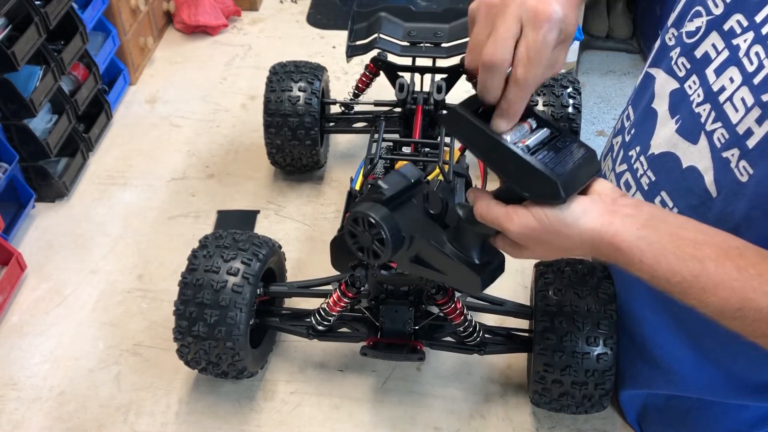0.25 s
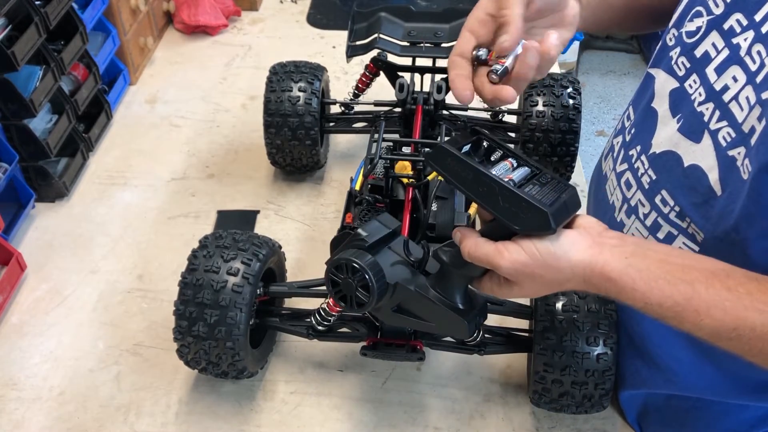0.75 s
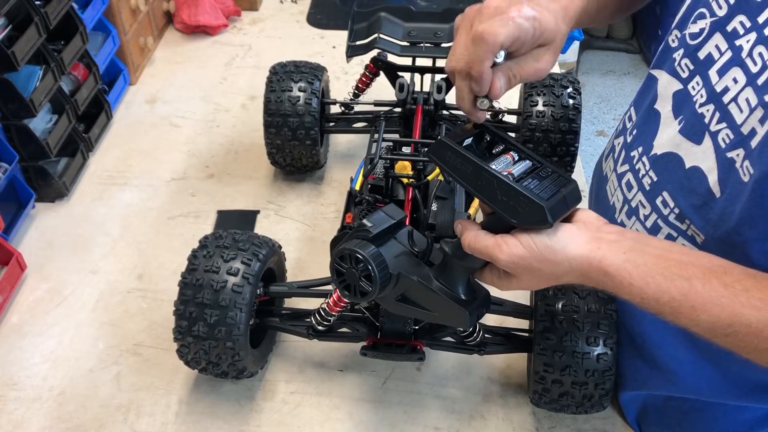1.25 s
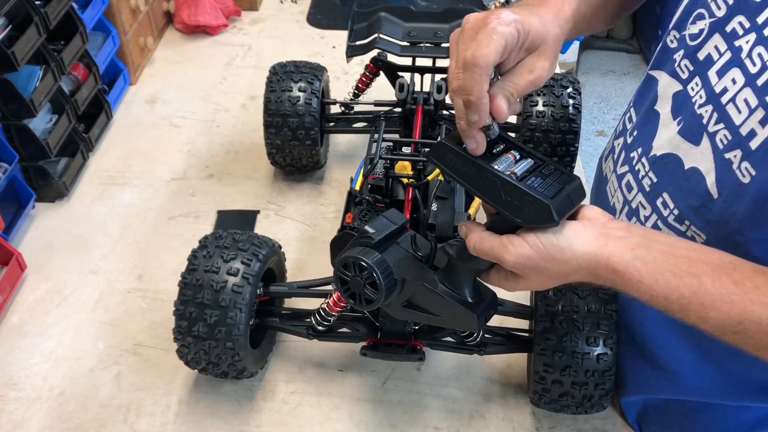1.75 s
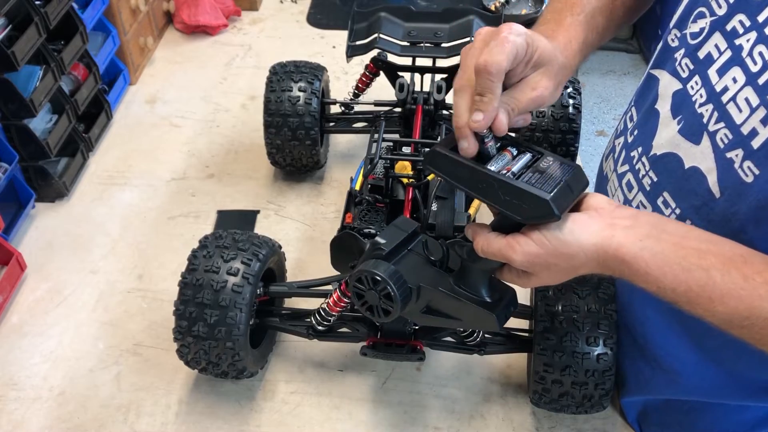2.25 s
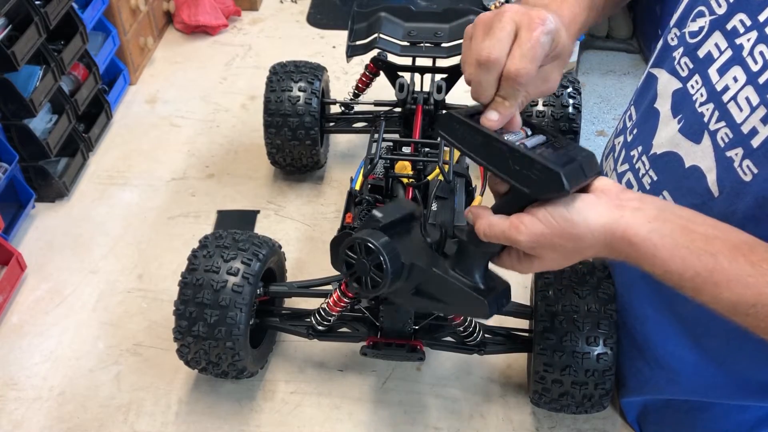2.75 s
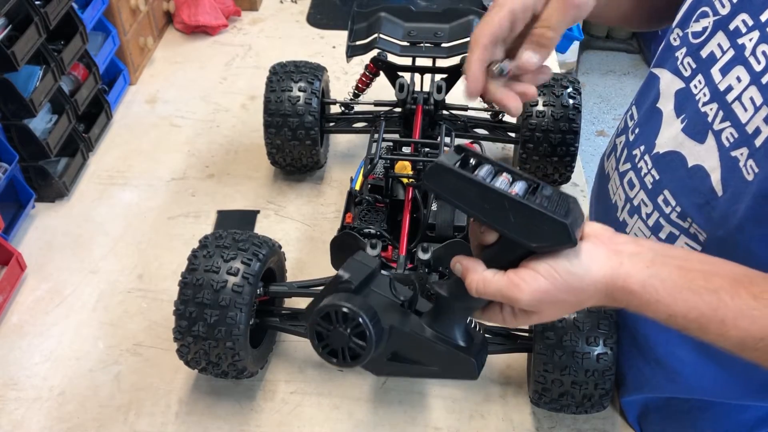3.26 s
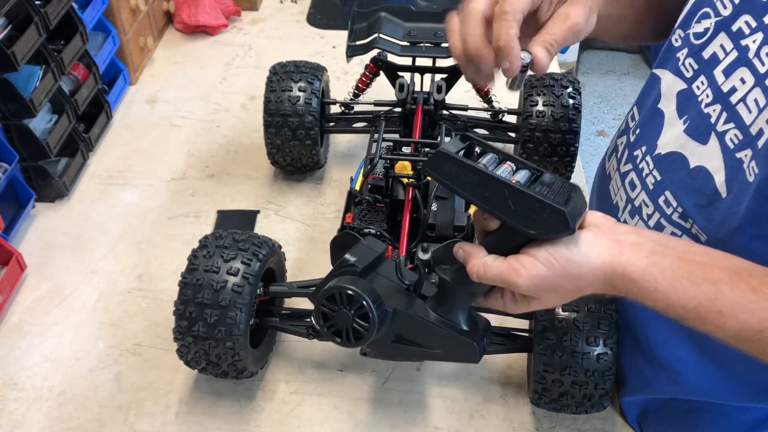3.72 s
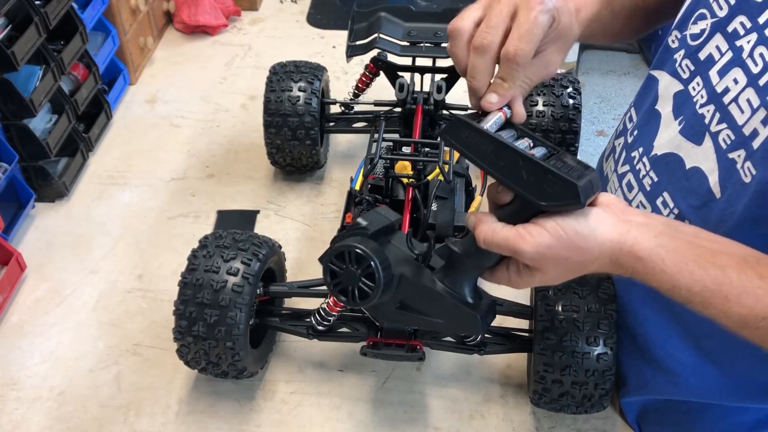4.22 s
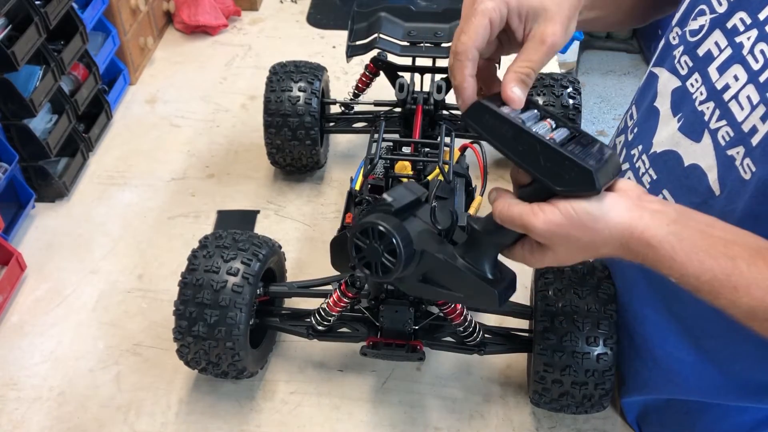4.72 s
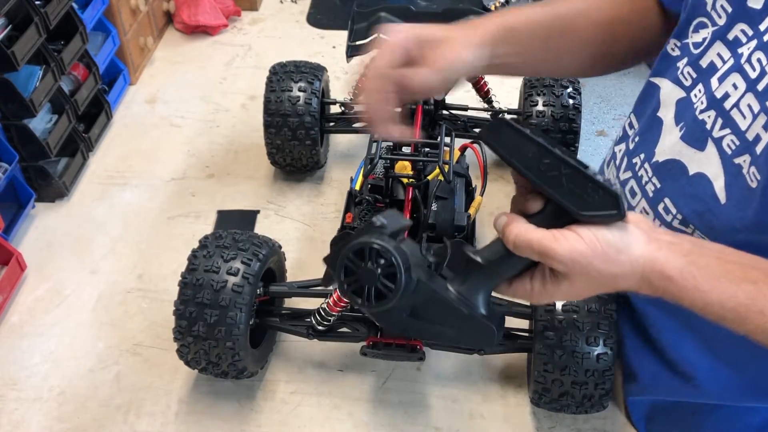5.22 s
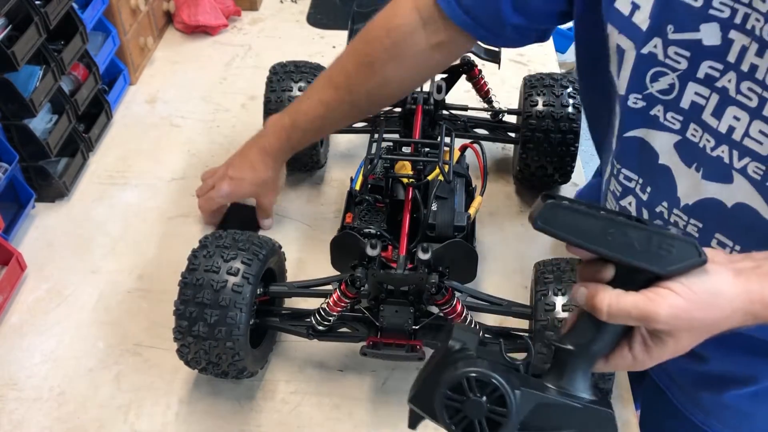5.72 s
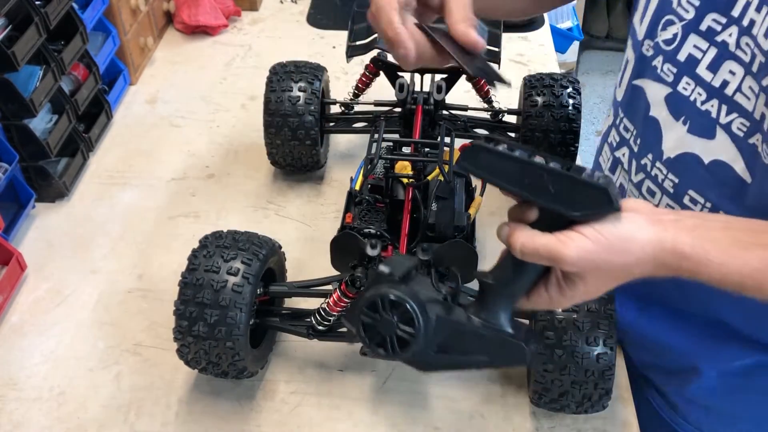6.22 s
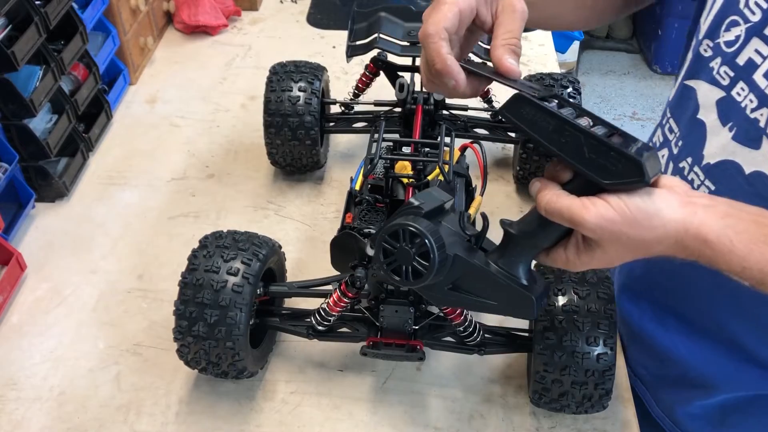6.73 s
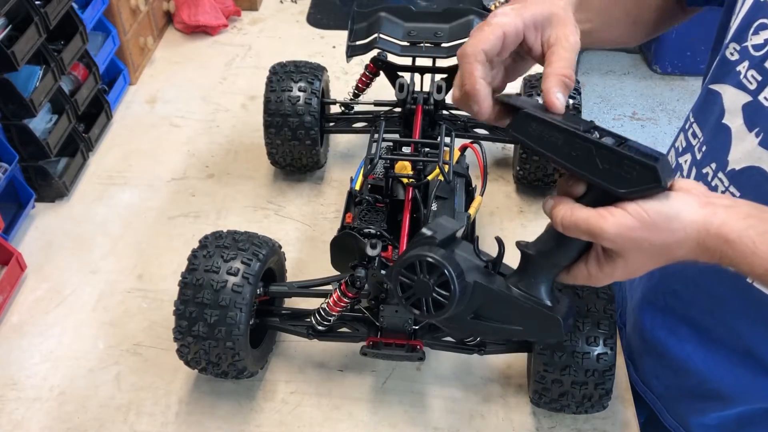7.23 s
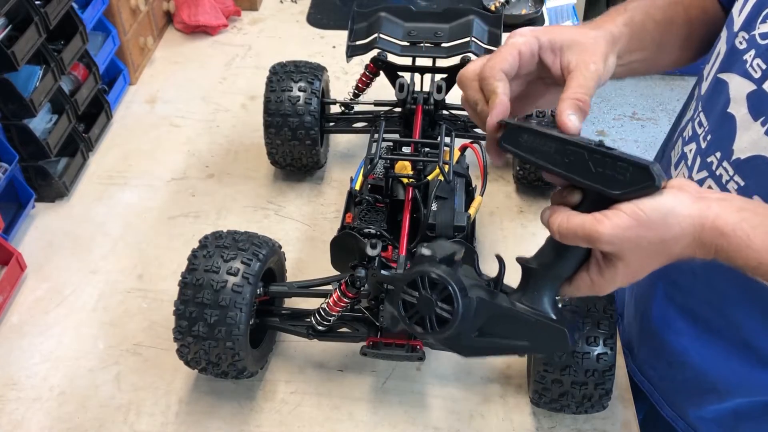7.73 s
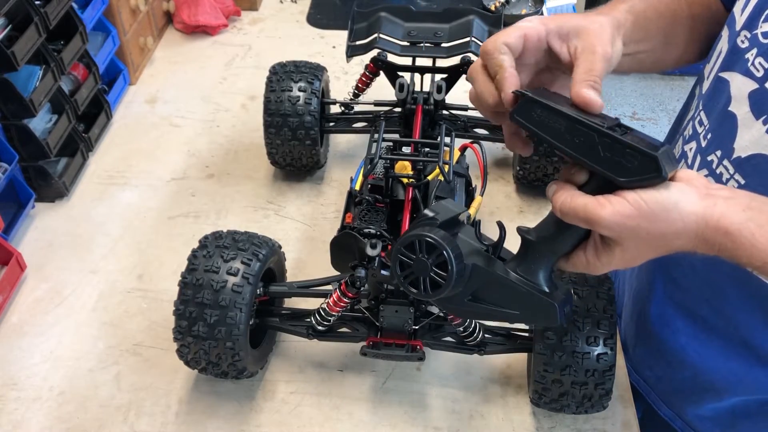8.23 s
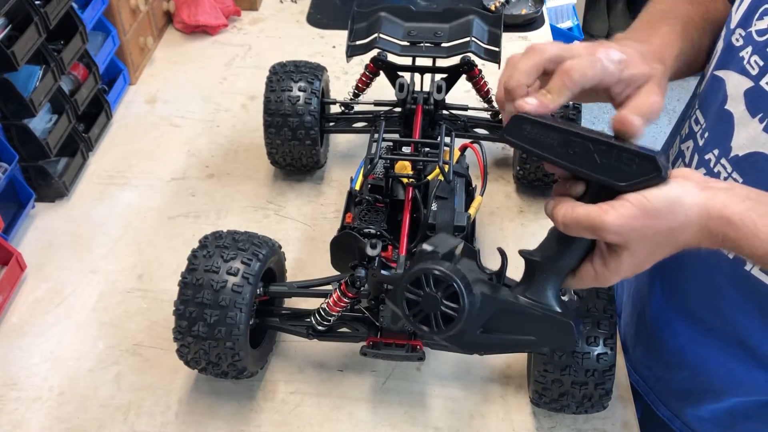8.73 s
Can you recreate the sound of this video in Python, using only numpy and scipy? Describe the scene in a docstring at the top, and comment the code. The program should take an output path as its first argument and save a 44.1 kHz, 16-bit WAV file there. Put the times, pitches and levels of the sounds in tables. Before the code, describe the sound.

Sharp, irregular plastic clicks of batteries being seated and a cover latching in a small workshop, with a soft hum and insect-like buzz.

```python
"""A machine hums throughout; faint birds call outside. For the first 5 s batteries are pushed one by one
into a hand-held plastic transmitter: each contact is a chatter of tiny impacts that rings the hollow
case and echoes in a small workshop. From 5 s a high, insect-like buzz swells. Near 5.7 s fingers bump
the bench and the cover scrapes off it. From 6.5 s the cover slides and clicks on the case; the buzz
falls back by about 8 s, and the cover snaps on near 8.5 s."""
import sys
import numpy as np
from scipy import signal
from scipy.fft import rfft, irfft, next_fast_len
from scipy.io import wavfile
from scipy.ndimage import uniform_filter1d, map_coordinates

SR = 44100
rng = np.random.default_rng(int(sys.argv[2]) if len(sys.argv) > 2 else 0)


def log_audio(samples):
    """Write samples as a 16-bit WAV file to the path given in sys.argv[1]."""
    # one column per channel
    frames = np.atleast_2d(samples).T
    # limit to full scale, then quantise
    limited = np.clip(frames, -1, 1)
    pcm = np.round(limited * 32767).astype(np.int16)
    wavfile.write(sys.argv[1], SR, pcm)


N = 395577
TIME_S = np.arange(N) / SR
TOP_HZ = 16000

# cell, spring and cover contacts: start_s, level_db, knock_db, bite_db, snap_db, ring_hz
CONTACTS = [(0.123, -45, -9, 1, -30, 3380), (0.1929, -22.5, -7, 4.5, 2, 2200),
            (0.2335, -33.5, -2, 10, -23, 3160), (0.318, -40.5, -27, 4.5, -15, 2180),
            (1.412, -49, -13, 4, -30, 2270), (1.998, -57.5, -5, 3, -21, 1940),
            (2.29, -44, 8, 2.5, -19, 1620), (2.351, -52, -7, 6, -3, 1610), (2.3625, -30, 1, 3.5, -8, 1740),
            (2.4143, -28.5, -13, 4.5, 7.5, 2290), (2.488, -42, 1, -19, -31, 1230),
            (2.5154, -38, -1, -1, -14, 1570), (2.689, -37, 1.5, -7, -17, 1380),
            (2.8738, -24.5, -3, 5, -4.5, 1700), (2.8854, -19.5, -3.5, 2.5, -10, 1560),
            (3.129, -48, -6, 5, -10, 3470), (4.108, -36.5, 0, 2, -26, 2090), (4.24, -42, -2, -2, -21, 3290),
            (4.3163, -37, -8, -4.5, -19, 1250), (4.361, -43.5, -3, -6, -24, 1550),
            (4.453, -49.5, -4, 7, -10, 2940), (4.5908, -24.5, -10.5, 2.5, 1.5, 3090),
            (4.739, -45.5, 6, -3, -4, 2500), (4.7437, -26, -3, 5.5, -9, 2500),
            (6.466, -40, -2.5, 5, 2.5, 2700), (6.736, -36.5, -1.5, 1.5, -5, 2740),
            (7.2225, -32.5, -3, 5, 3, 3390), (7.2595, -39, 4.5, 7, 1, 1200),
            (7.2622, -33.5, 2, 8, 5.5, 2970), (7.3936, -32.5, 0.5, 2, -2, 2050),
            (7.612, -35.5, -1.5, 2, -13, 1130), (8.4497, -31, -9, 0, -16, 2140),
            (8.4587, -26, 2, 7, 6, 1150), (8.4695, -33, -4, 0, -9, 420), (8.5639, -28.5, -6, 8, -9, 1620),
            (8.851, -52, 3, 3, -7, 420)]
# hollow case: centre_hz, width_hz, gain_db
CASE_MODES = [(411, 36, -0.5), (501, 30, -2.5), (691, 22, 16), (1018, 46, 0.5), (1270, 64, -0.5),
              (1394, 35, -6.5), (1605, 44, 2), (1804, 37, -6), (2020, 89, -5.5), (2204, 130, -3.5),
              (2506, 67, 0), (2714, 22, -2.5), (2930, 52, -5), (3170, 46, -6), (3620, 120, -11),
              (4560, 1350, -8.5)]
# loose cover: centre_hz, width_hz, gain_db
COVER_MODES = [(550, 100, 1), (770, 68, 13), (1580, 56, 13.5), (2200, 50, 9), (2495, 60, 11.5),
               (2680, 53, 6), (3060, 110, 4.5), (3720, 200, 4)]
# fingers on the bench: start_s, level_db
FINGER_BUMPS = [(5.719, -42), (5.742, -45), (5.768, -39.5), (5.835, -42)]
# cells and cover sliding: start_s, length_s, level_db
SLIDES = [(0.046, 0.017, -51), (4.541, 0.015, -45.5), (4.574, 0.018, -50.5), (5.765, 0.013, -46),
          (5.898, 0.029, -45.5), (5.917, 0.045, -45), (6.573, 0.015, -48), (6.616, .025, -51.5),
          (6.711, 0.02, -53), (7.345, 0.03, -46.5), (7.597, 0.016, -47)]
# bird calls: start_s, relative_db
CALLS = [(0.82, -56), (1.21, -59), (1.845, -57), (3.394, -55), (5.165, -54), (7.77, -55.5), (8.76, -55)]
# notes of one call: delay_s, start_hz, end_hz, relative_db
CALL_NOTES = [(0, 4560, 4345, -0.5), (.055, 3505, 3660, -2)]
# buzz spectrum before its resonances: freq_hz, gain_db
BUZZ_SPECTRUM = [(1700, -8), (2500, -9.5), (3500, -14), (4300, -1.5), (4700, -3), (6000, 0), (7000, 3),
                 (8100, 4.5), (9000, -0.5), (10000, -2), (15000, -9)]
# buzz resonances: centre_hz, nominal_width_hz, gain_db
BUZZ_MODES = [(2370, 66, 15.5), (3390, 570, 18), (4160, 210, 7.5), (5050, 130, 6), (8030, 160, 2.5)]
# swells added to the resting buzz: start_s, end_s, level_db
BUZZ_SWELLS = [(2.3, 3.87, -69.5), (5.05, 8.13, -57), (7.6, 8.9, -70)]
# thin insect tones: centre_hz, nominal_width_hz, full_from_s, level_db
INSECT_TRILLS = [(9520, 130, 0.5, -77), (11500, 260, 8, -79)]
# machine tones: pitch_hz, relative_db
HUM_TONES = [(53.8, -66.5), (134.6, -81.5), (236.9, -78.5), (818.3, -74), (1055, -76.5), (1357, -77)]
# moving air: freq_hz, gain_db
AIR_SPECTRUM = [(15, -46), (25, -35), (43, -17), (64, -6.5), (82, -4.5), (123, -2), (205, -10), (235, -0.5),
                (261, -7.5), (587, -14), (1060, -13), (1510, -18), (1870, -20.5), (7030, -20), (15800, -63)]
# workshop decay: freq_hz, t60_s
ROOM_DECAY = [(200, 0.59), (700, 0.34), (2500, 0.41), (5000, 0.35), (8000, 0.32), (14000, 0.22)]
# spectra of bump, scrape, bird pitch waver and room echo: freq_hz, gain_db
BUMP_SPECTRUM = [(38, -36), (62, 2), (75, 8), (100, -7), (185, 1.5), (290, -17), (700, -21), (2000, -37)]
GRIT_SPECTRUM = [(100, -21), (210, 15.5), (400, 12.5), (1000, -2.5), (3500, 7.5), (8000, 0),
                 (15000, -4.5)]
WAVER_SPECTRUM = [(300, -8), (1000, -40)]
ECHO_SPECTRUM = [(300, -3), (700, 2), (2500, 2), (5500, -1.5), (13000, -3.5)]


def clicks():
    """Cells are seated one by one, then the cover is latched."""
    out = np.zeros(N)
    for start_s, *contact in CONTACTS:
        add(out, start_s, click(*contact))
    return out


def click(level_db, knock_db, bite_db, snap_db, ring_hz, ring_db=9, ring_width_hz=480, wet_db=-9):
    """One contact excites the case and favours one ring."""
    body = bench_reflection(case_response(chatter(knock_db, snap_db), knock_db, bite_db, snap_db))
    ring = lambda hz: resonances(hz, [(ring_hz, ring_width_hz, ring_db)])
    # the ring beams out of the open compartment; the room gets less of it
    direct = filtered(body, lambda hz: causal(ring(hz)))
    out = room_echo(filtered(body, lambda hz: causal(np.sqrt(ring(hz)))), wet_db)
    add(out, 0, direct)
    rms_over_10ms = np.sqrt(np.sum(direct ** 2) / (SR / 100))
    return amp(level_db) * out / rms_over_10ms


def chatter(knock_db, snap_db, hold_s=0.0003, crack_t60_s=0.0098, rattle_db=-9, grain=0.43):
    """Contact force: a crack and a dying rattle of tiny impacts."""
    t = np.arange(4096) / SR
    rise_s = 0.00066 * 2 ** (-snap_db / 12)  # soft contacts build slowly
    rattle_t60_s = 0.069 * 2 ** (knock_db / 21)  # heavy knocks rattle on
    impacts = rng.standard_normal(len(t)) * np.exp(grain * rng.standard_normal(len(t)))
    after_s = np.maximum(t - rise_s - hold_s, 0)
    decay = fade(after_s, crack_t60_s) + amp(rattle_db) * fade(after_s, rattle_t60_s)
    return whitened(impacts * np.minimum(t / rise_s, 1) * decay, band_bins=70)


def case_response(force, knock_db, bite_db, snap_db, ripple_db=2, shell_db=-9):
    """Case modes over the broad shell response; high modes get new strengths at each blow."""
    colour = [(80, knock_db - 29), (220, knock_db - 18), (370, knock_db + 0.5), (700, knock_db - 3),
              (1200, 0), (2300, 0), (3700, bite_db), (7800, (bite_db + snap_db) / 2 - 1.5),
              (10500, snap_db + 2), (15500, snap_db - 1.5), (17500, snap_db - 15)]
    strengths_db = ripple_db * rng.standard_normal(60)
    ripple = lambda hz: np.interp(hz, np.linspace(3000, TOP_HZ, len(strengths_db)), strengths_db, left=0)
    gain = lambda hz: resonances(hz, CASE_MODES, shell_db) * amp(along(colour, hz) + ripple(hz))
    return filtered(force, lambda hz: causal(gain(hz)))


def bench_reflection(x, delay_s=0.003316, echo_db=-3, dull_hz=1600):
    """The bench and the parts on it add a dull, delayed copy."""
    lowpass = lambda hz: 1 / (1 + 1j * hz / dull_hz) ** 2
    return filtered(x, lambda hz: 1 + amp(echo_db) * np.exp(-2j * np.pi * hz * delay_s) * lowpass(hz))


def bumps(rise_s=0.0044, t60_s=0.21):
    """Fingers thud softly on the bench while taking the cover."""
    out, t = np.zeros(N), np.arange(8192) / SR
    envelope = fade(t, t60_s) * (1 - np.exp(-t / rise_s))
    for start_s, level_db in FINGER_BUMPS:
        add(out, start_s, amp(level_db) * noise(BUMP_SPECTRUM, len(t)) * envelope)
    return out


def scrapes(grain=0.99, wet_db=-4):
    """Sliding cells and cover: gritty friction, all coloured by the cover's modes."""
    out, t = np.zeros(N), np.arange(8192) / SR
    cover = lambda hz: causal(resonances(hz, COVER_MODES) * amp(along(GRIT_SPECTRUM, hz)))
    for start_s, length_s, level_db in SLIDES:
        stroke = np.sin(np.pi * np.minimum(t / length_s, 1))
        friction = rng.standard_normal(len(t)) * np.exp(grain * rng.standard_normal(len(t)))
        grit = filtered(whitened(stroke * friction, band_bins=60), cover)
        grit *= np.linalg.norm(stroke) / np.linalg.norm(grit)
        add(out, start_s, in_room(amp(level_db) * grit, wet_db))
    return out


def birds(note_s=0.075, scatter=0.04, waver=0.075, gain_db=-23, wet_db=20):
    """Distant, burry two-note calls, high then low, heard mostly as echo."""
    out, progress = np.zeros(N), np.linspace(0, 1, int(note_s * SR))
    for start_s, call_db in CALLS:
        for delay_s, start_hz, end_hz, note_db in CALL_NOTES:
            ends_hz = np.array([start_hz, end_hz]) * (1 + scatter * rng.standard_normal(2))
            burr = 1 + waver * noise(WAVER_SPECTRUM, SR // 2)[:len(progress)]
            pitch_hz = np.interp(progress, [0, 1], ends_hz) * burr
            chirp = np.sin(2 * np.pi * np.cumsum(pitch_hz) / SR) * np.sin(np.pi * progress)
            add(out, start_s + delay_s, amp(call_db + note_db + gain_db) * in_room(chirp, wet_db))
    return out


def insects(rest_db=-69, rise_s=0.71, fall_s=0.58, flutter_db=0.3, trill_rise_s=0.35):
    """A resonant hiss swells and fades; thin noise-band trills enter and hold."""
    modes = lambda hz: sum(amp(db) ** 2 * peak(hz, f, 1.14 * w) ** 2 for f, w, db in BUZZ_MODES)
    buzz = unit_rms(filtered(noise(BUZZ_SPECTRUM), lambda hz: np.sqrt(1 + modes(hz))))
    swell = sum(amp(db) * np.clip(np.minimum((TIME_S - start_s) / rise_s, (end_s - TIME_S) / fall_s), 0, 1)
                for start_s, end_s, db in BUZZ_SWELLS)
    out = (amp(rest_db) + swell) * amp(flutter_db * wobble(5)) * buzz
    for centre_hz, width_hz, full_from_s, level_db in INSECT_TRILLS:
        tone = unit_rms(filtered(rng.standard_normal(N), lambda hz: peak(hz, centre_hz, 2 * width_hz)))
        out += amp(level_db) * tone * np.clip(1 + (TIME_S - full_from_s) / trill_rise_s, 0, 1)
    return out


def machine_hum(gain_db=-1, drift_db=0.96, drift_rad=0.84):
    """Machine tones, each wandering in level and phase."""
    out = np.zeros(N)
    for pitch_hz, relative_db in HUM_TONES:
        rms = amp(gain_db + relative_db + drift_db * wobble(1.93))
        phase_rad = 2 * np.pi * pitch_hz * TIME_S + drift_rad * wobble(4 + pitch_hz / 20)
        out += rms * np.sqrt(2) * np.sin(phase_rad)
    return out


def air(level_db=-59, drift_db=0.5):
    """Moving air: a low, near-steady rush."""
    return amp(level_db + drift_db * wobble(2.1)) * noise(AIR_SPECTRUM)


def room_echo(x, wet_db, build_s=0.0033):
    """Workshop echo of x: a fresh diffuse tail whose treble dies first."""
    band_hz, t, bands = signal.stft(rng.standard_normal(SR // 2), SR, nperseg=256)
    tail = signal.istft(bands * fade(t, along(ROOM_DECAY, band_hz)[:, None]), SR, nperseg=256)[1]
    tail *= 1 - np.exp(-(np.arange(len(tail)) / SR / build_s) ** 2)
    tail /= np.linalg.norm(tail)
    return signal.fftconvolve(x, filtered(tail, lambda hz: amp(wet_db + along(ECHO_SPECTRUM, hz))))


def in_room(x, wet_db):
    """Direct sound plus echo."""
    out = room_echo(x, wet_db)
    out[:len(x)] += x
    return out


def amp(db):
    return 10 ** (np.asarray(db) / 20)


def unit_rms(x):
    return x / np.sqrt(np.mean(x ** 2) + 1e-20)


def along(points, hz):
    """Interpolate (freq_hz, value) points on a log axis."""
    freq_hz, values = np.transpose(points)
    return np.interp(np.log(hz + 1), np.log(freq_hz + 1), values)


def fade(t, t60_s):
    return np.exp(-np.log(1000) * t / np.maximum(t60_s, 1e-4))


def wobble(rate_hz):
    """Smooth random curve with knots at rate_hz."""
    knots = rng.standard_normal(int(N * rate_hz / SR) + 4)
    return map_coordinates(knots, [np.arange(N) * rate_hz / SR])


def filtered(x, response):
    size = 2 * next_fast_len(len(x))
    return irfft(rfft(x, size) * response(np.fft.rfftfreq(size, 1 / SR)), size)[:len(x)]


def noise(spectrum, size=N):
    """Coloured noise, rms 1."""
    return unit_rms(filtered(rng.standard_normal(size), lambda hz: amp(along(spectrum, hz))))


def causal(gain):
    """Minimum-phase response: rings only after the blow."""
    cepstrum = irfft(np.log(np.maximum(gain, 1e-6)))
    half = len(cepstrum) // 2
    cepstrum[1:half] *= 2
    cepstrum[half + 1:] = 0
    return np.exp(rfft(cepstrum))


def peak(hz, centre_hz, width_hz):
    """Power response of one resonance."""
    return 1 / (1 + (2 * (hz - centre_hz) / width_hz) ** 2)


def resonances(hz, modes, floor_db=0):
    """Gain of modes over a flat floor."""
    return np.sqrt(amp(floor_db) ** 2 + sum(amp(db) ** 2 * peak(hz, f, w) for f, w, db in modes))


def whitened(x, band_bins):
    """Even out a burst's energy across bands."""
    power = uniform_filter1d(np.abs(rfft(x)) ** 2, band_bins)
    return irfft(rfft(x) * causal(np.sqrt(power.mean() / np.abs(power))))


def add(track, start_s, x):
    i = max(round(start_s * SR), 0)
    track[i:i + len(x)] += x[:max(len(track) - i, 0)]


def scene():
    """Mono mix."""
    return (clicks() + bumps() + scrapes() + birds() + insects() + machine_hum() + air())[None]


def record(dry):
    """Low-pass at TOP_HZ, 600 Hz transition."""
    return np.array([filtered(x, lambda hz: np.clip((TOP_HZ - hz) / 600 + .5, 0, 1)) for x in dry])


dry = scene()
out = record(dry)
log_audio(out)
```